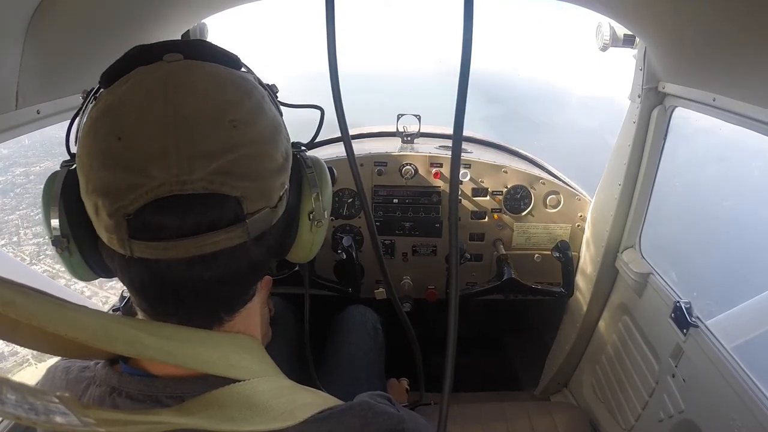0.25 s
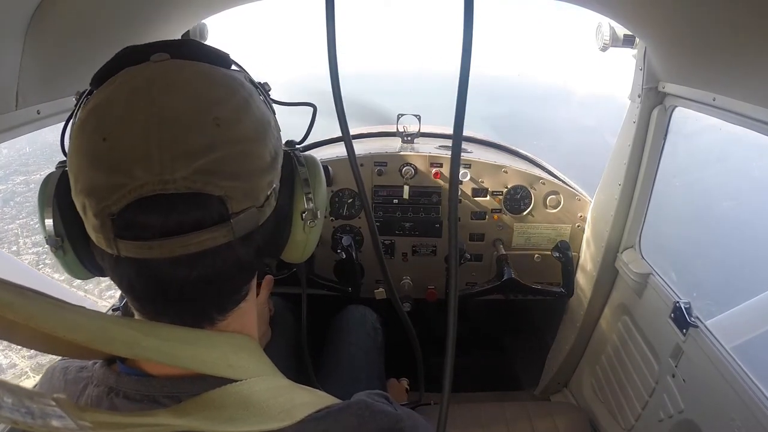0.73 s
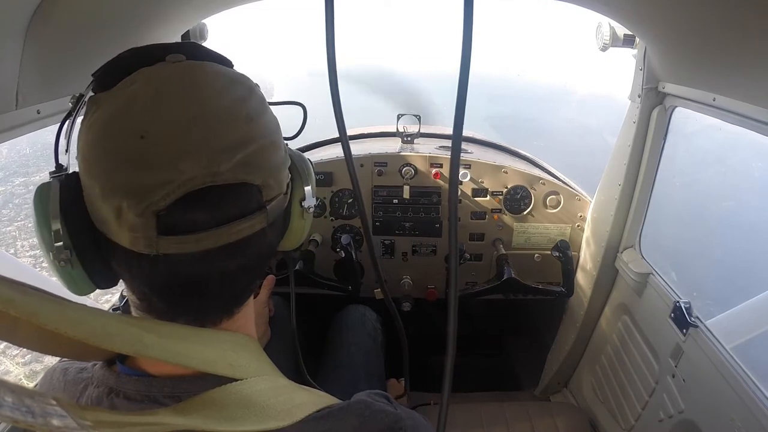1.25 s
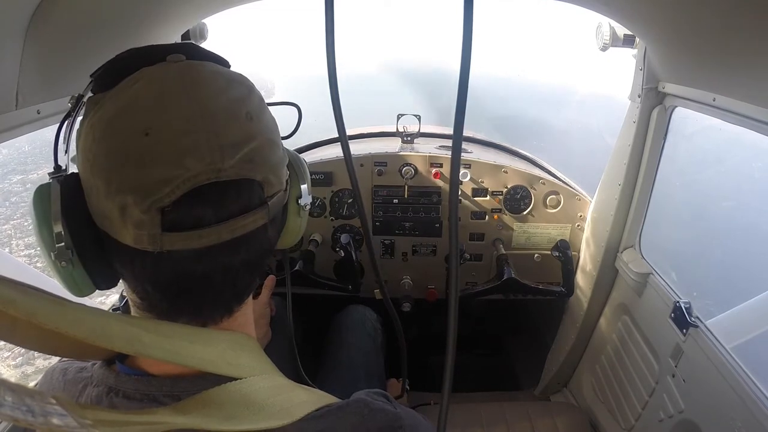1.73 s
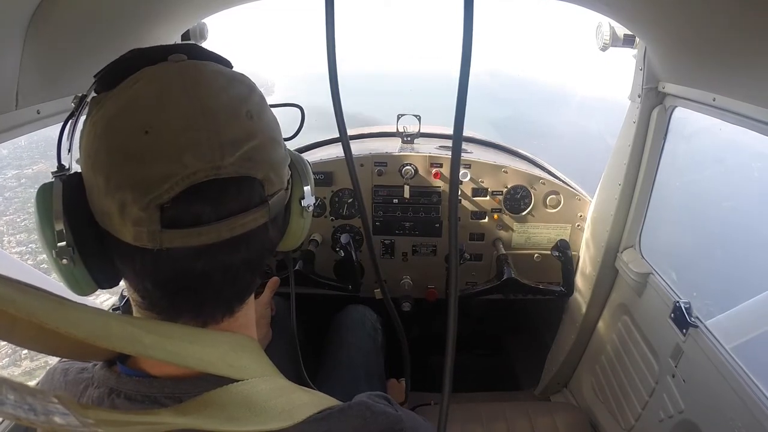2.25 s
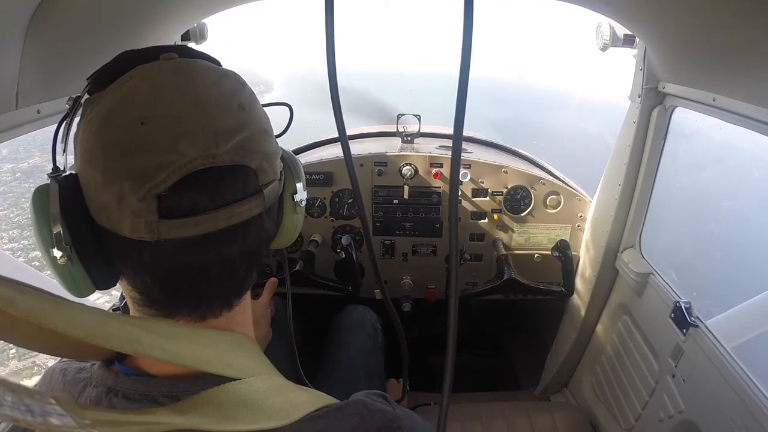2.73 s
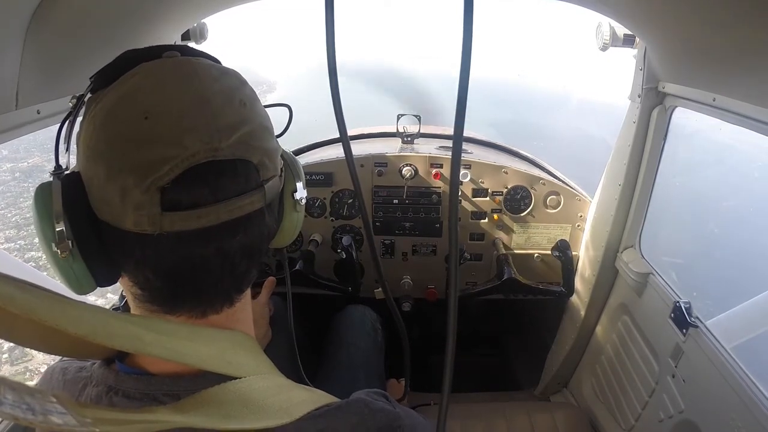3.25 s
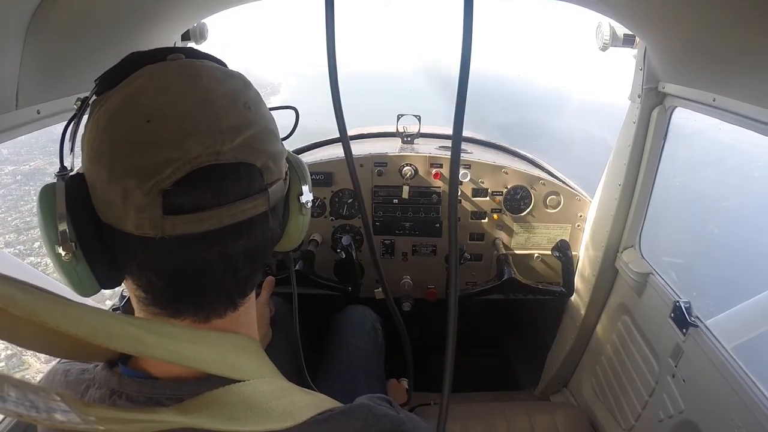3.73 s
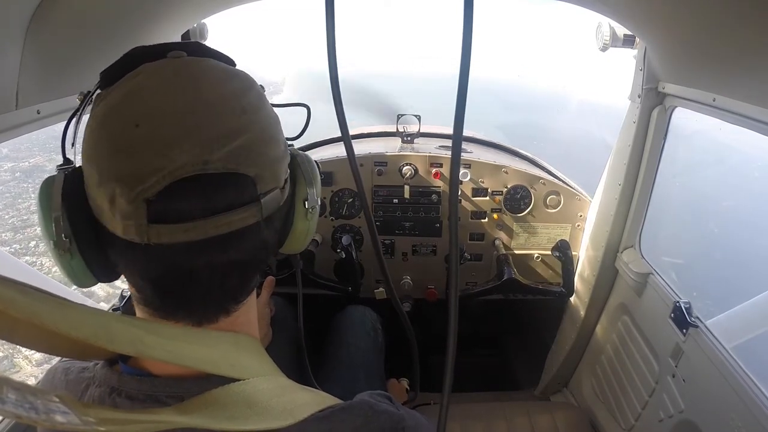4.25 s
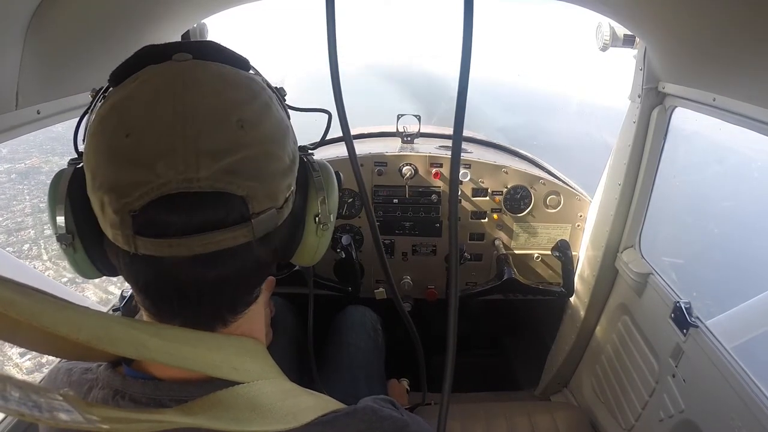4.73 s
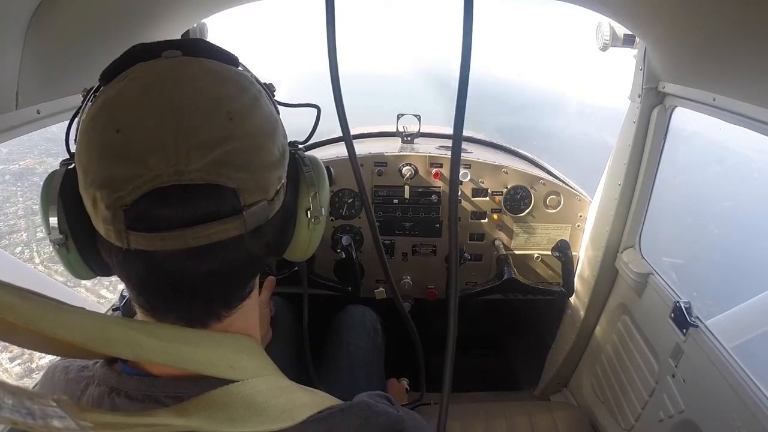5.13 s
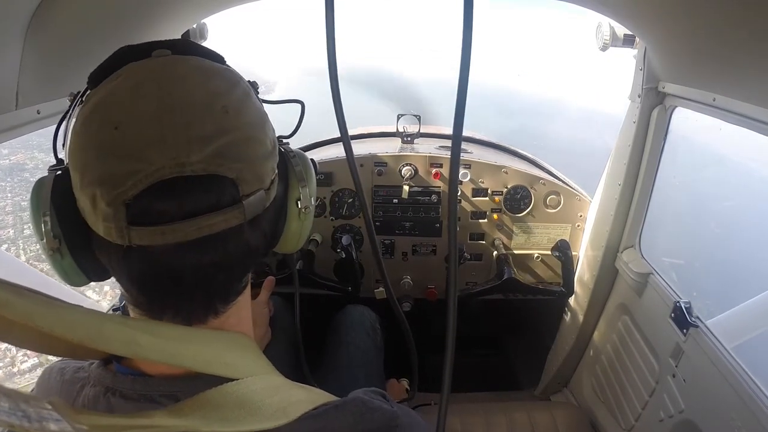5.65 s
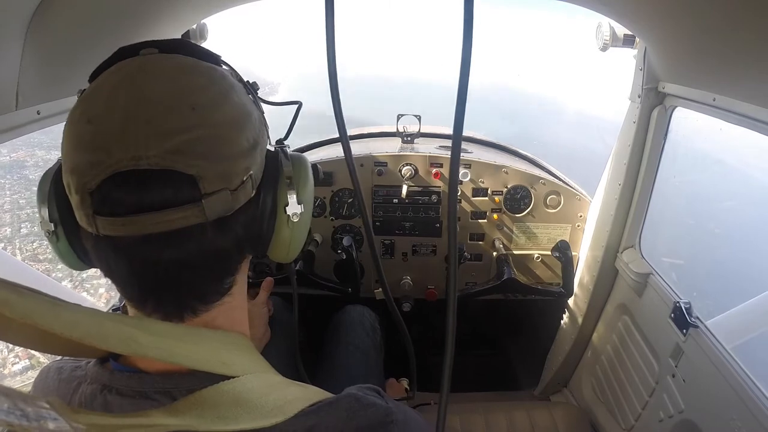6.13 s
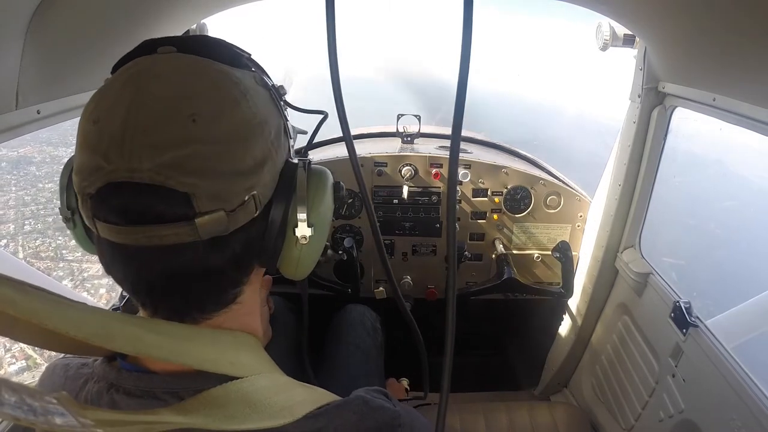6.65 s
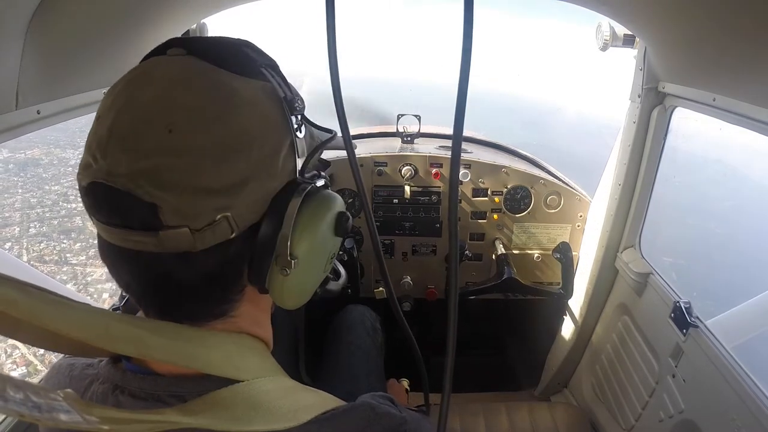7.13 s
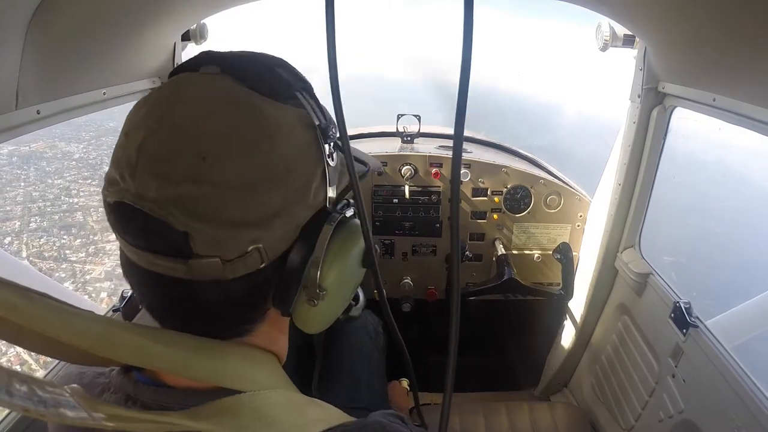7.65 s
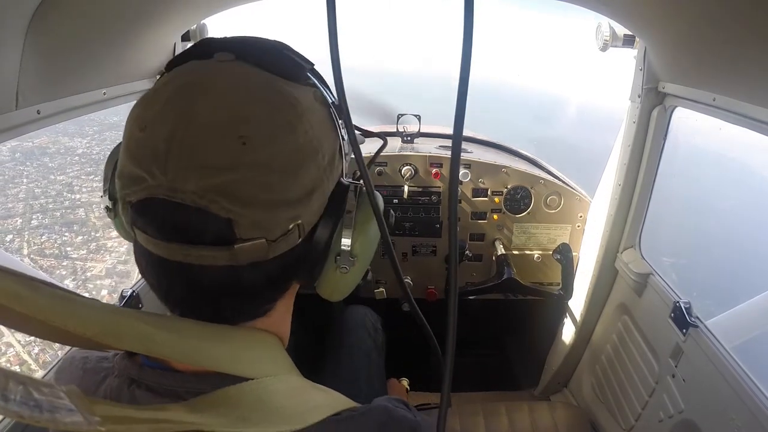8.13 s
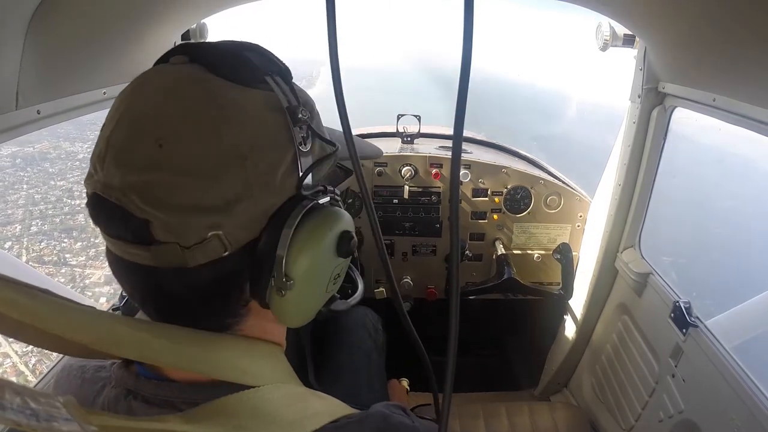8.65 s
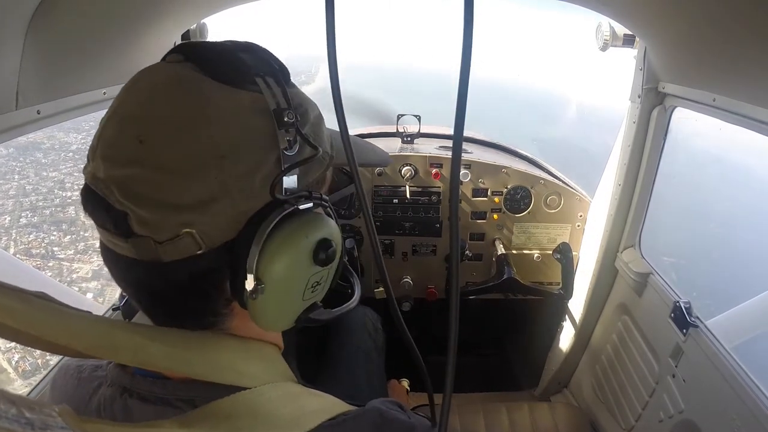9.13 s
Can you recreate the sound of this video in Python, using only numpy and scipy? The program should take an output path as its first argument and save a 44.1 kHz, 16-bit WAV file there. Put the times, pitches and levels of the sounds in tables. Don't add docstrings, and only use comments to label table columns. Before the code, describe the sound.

Constant deep propeller-plane hum heard from behind the pilot, nearly unchanging, with low buffeting, light metallic clatter and a muffled wind hiss.

```python
import sys
import numpy as np
from scipy import signal
from scipy.fft import rfft, irfft, next_fast_len
from scipy.io import wavfile
from scipy.ndimage import uniform_filter1d, map_coordinates

SR = 44100
rng = np.random.default_rng(int(sys.argv[2]) if len(sys.argv) > 2 else 0)


def elevation(decibels):
    levels = np.asarray(decibels, float)
    return 10 ** (levels / 20)


def unload_wav(signal):
    wavfile.write(
        sys.argv[1],
        SR,
        np.round(np.clip(np.atleast_2d(signal).T, -1, 1) * 32767).astype(np.int16),
    )


N = 414099

# t/s, firing rate f/Hz
FIRING_RATE = [
    (0, 77.65),
    (1.2, 77.54),
    (3.1, 77.5),
    (4, 77.8),
    (4.75, 77.82),
    (5.5, 78.18),
    (6.5, 78.19),
    (7.3, 78.12),
    (8.7, 78.04),
    (9.39, 77.76),
]
# t/s, firing tone level/dB, sharpness of the exhaust beat/dB
ENGINE_LOAD = [(0, -19.5, .5), (1.7, -20, -.5), (2.2, -19.5, 1), (3.4, -19, -1), (4.1, -20.5, -0.5),
               (4.4, -20, -0.5), (5.8, -20.3, -1), (6.7, -20.8, -1.5), (7.4, -21, -2.2), (7.9, -19, -3),
               (8.3, -22, -3), (8.65, -19.8, -1.5), (9.2, -20, 3), (9.39, -18.5, -4.5)]
# order, level re firing/dB, unsteadiness/dB
DRONE_ORDERS = [(1, -20.5, -2), (2, -25.5, -2), (3, -46, -6), (4, 0, -0.37), (5, -18, 0.5), (6, -21, -1),
                (8, -13, 1.5), (11, -16, 0.45), (12, -11.5, 0.4), (13, -33, -1), (14, -27.5, 3),
                (16, -30, 2.5), (18, -29, 2), (20, -29.5, 3)]
# share of the cycle, level/dB
VALVE_TAPS = [
    (0.089, -3),
    (.23, 0),
    (.31, -6.5),
    (.41, -5),
    (.47, 4),
    (.64, -3),
    (.74, 2),
    (.86, 7.5),
    (.94, -4),
]
# order, level re firing/dB
CRANKCASE_ORDERS = [(24, -34.0), (27, -37.0), (28, -33.0), (32, -35.0), (34, -34.0), (35, -41.0),
                    (36, -40.0), (37, -40.0), (38, -34.0), (39, -36.0), (40, -38.0), (42, -35.0),
                    (43, -38.0), (45, -38.0), (46, -34.0), (48, -33.0), (52, -38.0), (53, -37.0),
                    (54, -38.0), (57, -36.0), (59, -32.0), (61, -40.0), (66, -31.0), (67, -34.0),
                    (69, -40.0), (71, -37.0), (72, -38.0), (75, -39.0), (77, -39.0), (79, -40.0)]
# f/Hz, width/Hz, level/dB
PANEL_RINGS = [(538, 43, -1), (652, 77, -3.5), (738, 35, 0.5), (825, 20, 1), (935, 45, -1.5),
               (1028, 58, -2), (1139, 37, 2.5), (1267, 30.5, 5), (1376, 37, -1), (1468, 110, -5)]
# t/s, level/dB
GUSTS = [(0, -38.5), (1.7, -39.5), (2.05, -38), (2.4, -39), (4.05, -39.5), (4.47, -37.5), (4.68, -40.5),
         (5.1, -37), (5.75, -39.5), (6.27, -37.3), (6.5, -40), (6.65, -37.5), (7.68, -39.5), (8.3, -39),
         (8.42, -36.5), (8.8, -39.5), (9, -37), (9.39, -39)]
# f/Hz, level/dB per Hz
RUMBLE_COLOUR = [(8, -42), (16, -10), (35, -8.5), (60, 1.5), (100, 0), (140, -4.5), (180, -7.5),
                 (220, -4.5), (300, -6.5), (390, -3), (450, -11.5), (620, -15.5), (760, -22), (2000, -61)]
# f/Hz, level/dB per Hz
ROAR_COLOUR = [(350, -31), (600, -1), (696, -12.5), (840, -12), (911, -0.5), (988, -11.5), (1130, -4),
               (1280, -7), (1630, -8.5), (2340, -5.5), (3410, -7.5), (4470, -13.5), (6430, -18),
               (13100, -44), (15000, -52)]
# delay t/s, level/dB
WALL_ECHOES = [(.0012, -38), (.0023, -38), (.0038, -33), (.0057, -24), (.0071, -28), (.0096, -26),
               (.0131, -23), (.017, -18)]

OVERTONE_DB, RUMBLE_DB, COWLING_DB = -30.5, -30.5, -36
ROAR_DB = 1.58
RUMBLE_GROWS, COWLING_GROWS = 0.84, 0.8
EDDY_DB = 0.36
UNEVEN_GROWS = -0.4


def drone(cycles, firing_db, sharp_db):
    tones = np.zeros(N)
    for order, db, unsteady_db in DRONE_ORDERS:
        phase = 2 * np.pi * order * cycles + 0.1 * unsteady_db * wobble(5)
        if order == 8:
            phase -= np.pi / 2
        if order > 12:
            phase -= 2 * np.pi * rng.random()
        if order < 7:
            level_db = firing_db
        else:
            level_db = OVERTONE_DB + 10 + sharp_db * (UNEVEN_GROWS if order % 2 else 1)
        strength = elevation(level_db + db + unsteady_db * wobble(6))
        tones += strength * np.sqrt(2) * np.cos(phase)
    return tones


def valve_gear(cycles, jitter_s, scatter_db):
    share, db = np.transpose(VALVE_TAPS)
    slip = rng.standard_normal((int(cycles[-1]) + 1, len(VALVE_TAPS), 2))
    tap_cycle = np.arange(len(slip))[:, None] + share
    at = np.interp(tap_cycle, cycles, np.arange(N)) + jitter_s * SR * slip[..., 0]
    force = elevation(db + scatter_db * slip[..., 1])
    sample = np.clip(at, 0, N).astype(int)
    blows = np.bincount(sample.ravel(), force.ravel(), N + 1)[:N]
    blows[-1] = 0
    return unit(filtered(blows, lambda hz: panel_ringing(hz) / (1 + (hz / 1700) ** 6)))


def crankcase(cycles):
    drift = [wobble(10) for _ in range(6)]
    tones = np.zeros(N)
    for k, (order, db) in enumerate(CRANKCASE_ORDERS):
        phase = 2 * np.pi * (order * cycles + rng.random()) + 0.6 * drift[k % 6]
        strength = elevation(db + 2.5 * drift[(k + 3) % 6])
        tones += strength * np.sqrt(2) * np.cos(phase)
    return elevation(-20.5) * tones


def panel_ringing(f):
    total = 0
    for k, (centre, width, db) in enumerate(PANEL_RINGS):
        ring = 1j * f * width / (centre * centre - f * f + 1j * f * width)
        total = total + (-1) ** k * elevation(db) * ring
    return total


def slipstream(cycles):
    rumble = elevation(0.55 * wobble(20)) * rush(RUMBLE_COLOUR, patchy_db=0.5)
    wash = 0.32 * np.sin(2 * np.pi * cycles)
    gusts = 0.2 * wobble(11) + 0.51 * wobble(25) + wash
    roar = elevation(gusts) * cabin(rush(ROAR_COLOUR, patchy_db=0.08))
    shudder = 1.6 * np.cos(2 * np.pi * (cycles - 0.4)) + 2.2 * np.cos(4 * np.pi * (cycles - 0.45))
    ringing = unit(filtered(rng.standard_normal(N), panel_ringing))
    panels = elevation(gusts + shudder + 1.6 * wobble(28)) * ringing
    return rumble, roar, panels


def rush(colour, patchy_db):
    z = signal.stft(rng.standard_normal(N), nperseg=512)[2]
    patches = uniform_filter1d(rng.standard_normal(z.shape), size=8, axis=0)
    patches = uniform_filter1d(patches, size=12, axis=1)
    x = signal.istft(z * elevation(patchy_db * unit(patches)), nperseg=512)[1][:N]
    f, db = np.transpose(colour)
    return unit(filtered(x, lambda hz: elevation(np.interp(np.log(hz + 1), np.log(f + 1), db))))


def cabin(x):
    def walls(hz):
        total = 1
        for k, (delay, db) in enumerate(WALL_ECHOES):
            total = total + (-1) ** k * elevation(db) * np.exp(-2j * np.pi * hz * delay)
        return total
    return unit(filtered(x, walls))


def unit(x):
    return x / np.sqrt(np.mean(x ** 2) + 1e-20)


def curves(rows):
    t, *columns = np.transpose(rows)
    return [np.interp(np.arange(N) / SR, t, column) for column in columns]


def wobble(rate):
    coarse = np.arange(0, N + 64, 64)
    knots = rng.standard_normal(int(N * 40 / SR) + 6)
    smooth = map_coordinates(knots, [coarse * min(rate, 40) / SR])
    return np.interp(np.arange(N), coarse, smooth)


def filtered(x, response):
    m = next_fast_len(N + SR // 2)
    return irfft(rfft(x, m) * response(np.fft.rfftfreq(m, 1 / SR)), m)[:N]


def scene():
    firing_db, sharp_db = curves(ENGINE_LOAD)
    air_db = curves(GUSTS)[0] + EDDY_DB * wobble(12)
    gust_db = air_db - air_db.mean()
    cycles = np.cumsum(curves(FIRING_RATE)[0]) / SR / 4 + 0.07
    rumble, roar, panels = slipstream(cycles)
    taps = valve_gear(cycles, jitter_s=0.00029, scatter_db=4.0)
    cowling = elevation(-5.5) * panels + elevation(-10) * taps + elevation(35.5) * crankcase(cycles)
    air = elevation(RUMBLE_DB + RUMBLE_GROWS * gust_db) * rumble + elevation(air_db + ROAR_DB) * roar
    shell = elevation(COWLING_DB + COWLING_GROWS * gust_db) * cowling
    return (drone(cycles, firing_db, sharp_db) + shell + air)[None]


def top_cut(x):
    return signal.sosfilt(signal.butter(12, 15190, fs=SR, output="sos"), x)


def record(dry):
    return top_cut(dry)


dry = scene()
out = record(dry)
unload_wav(out)
```